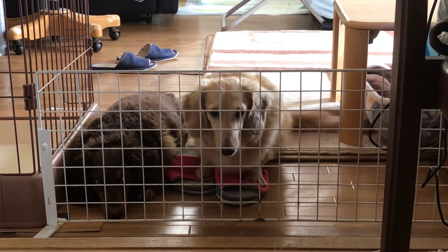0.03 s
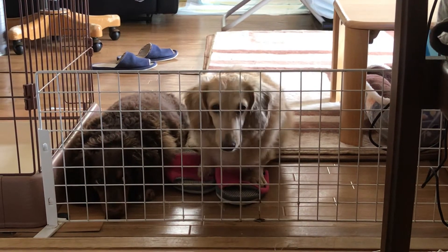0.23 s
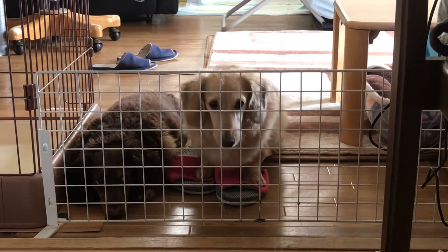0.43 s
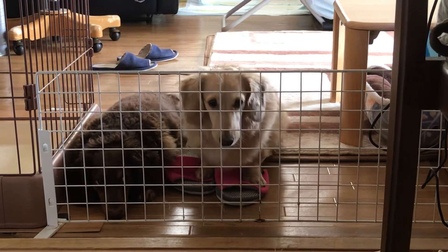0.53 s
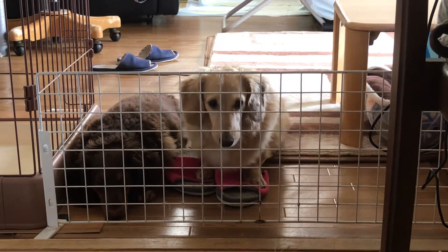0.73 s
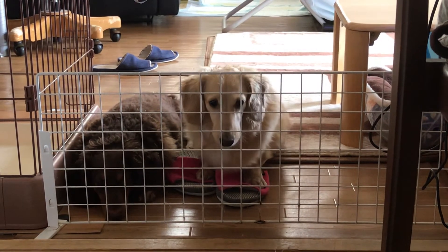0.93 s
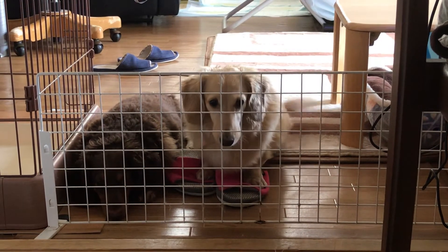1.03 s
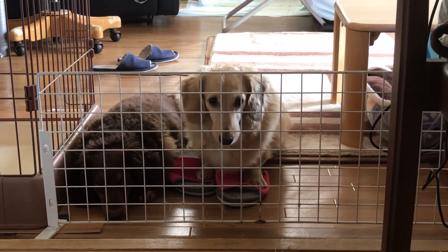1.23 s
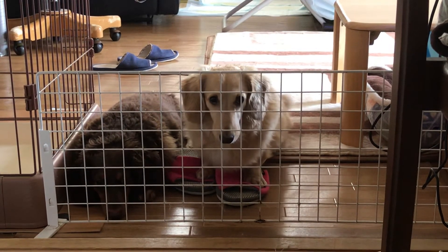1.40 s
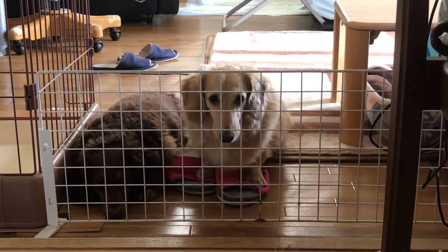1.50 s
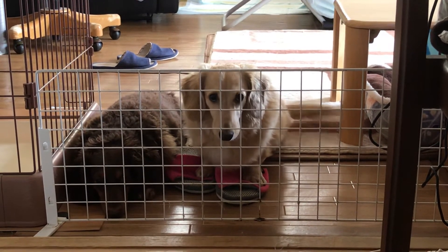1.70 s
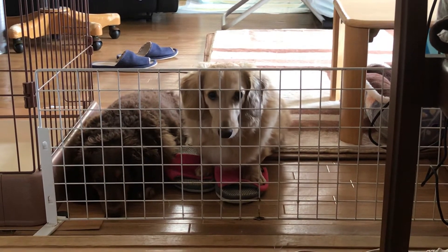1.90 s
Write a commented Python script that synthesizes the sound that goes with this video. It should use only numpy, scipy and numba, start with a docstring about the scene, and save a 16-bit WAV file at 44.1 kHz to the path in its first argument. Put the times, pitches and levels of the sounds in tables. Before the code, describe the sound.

A small dog gives one huffing woof that breaks up into a yelp and sinks into a low growl. Faint sniffs follow, then a long, rumbling breath out, close to the microphone in a quiet room.

```python
"""A small wooden-floored room, one microphone near a small dog behind a pet gate; faint mains hum.
After a soft rustle the dog gives one huffing woof, mouth barely open, air rushing through lips and
nose. Its pitch breaks upward into a yelp, then sinks into a low growl with two quick sniffs. A third
sniff whistles thinly as slack, uneven throat pulses set chest and throat rumbling over a long breath
out. The room rings briefly after each sound, and a few last rustles leave only room air and hum."""
import sys
import numpy as np
from scipy import signal
from scipy.fft import rfft, irfft
from scipy.io import wavfile
from scipy.ndimage import uniform_filter1d
from numba import njit

SR = 44100
rng = np.random.default_rng(int(sys.argv[2]) if len(sys.argv) > 2 else 0)


def store_pcm(level_fs):
    """Save levels as 16-bit WAV."""
    pcm = np.round(np.clip(level_fs, -1, 1) * 32767).astype(np.int16)
    wavfile.write(sys.argv[1], SR, np.atleast_2d(pcm).T)


N = 85995

# colour of the room air: freq_hz, gain_db
ROOM_AIR_COLOUR = [(20,-36),(40,-37),(65,-6),(160,-0.5),(270,-14.5),(345,-9),(450,-14),(1200,-18),(2000,-23.5),(15500,-36.5)]
# mains hum: pitch_hz, level_db
HUM_TONES = [(50.3,-67),(100.6,-68.5)]
# the dog's small movements: centre_s, half_length_s, level_db
RUSTLES = [(.055,0.016,-62.5),(1.236,0.004,-61),(1.558,0.0074,-64),(1.865,0.025,-66.5),(1.94,0.046,-72.5)]
# their colour: freq_hz, gain_db
RUSTLE_COLOUR = [(250,-7.5),(650,7.5),(2100,-0.5),(4500,-9),(15000,-26)]

# sniffs, the long breath out, and spurts that flap the lips: centre_s, half_length_s, level_db
SNIFFS = [(.65,0.023,-67.5),(.75,0.037,-66),(1.06,0.064,-69.5)]
EXHALE = [(1.33,0.31,-77)]
LIP_FLAPS = [(.396,0.0096,-48),(.419,0.0027,-50),(.444,0.0039,-47),(.519,0.003,-50.5)]
# nose whistle in the last sniff: time_s, pitch_hz, level_db
NOSE_WHISTLE = [(1.03,3650,-75),(1.06,3510,-75),(1.09,3290,-69),(1.13,3120,-88)]
# air flow along four paths: time_s, mouth_db, lips_db, teeth_db, nose_db
AIR_FLOW = [(.208,-95,-85,-59,-92),(.215,-58,-62,-60.5,-92),(.24,-51.5,-70,-56,-83),(.28,-49.5,-63,-54.5,-56),(.335,-45.5,-56,-51.5,-79),(.37,-48,-51.5,-53.5,-55.5),(.398,-52,-45.5,-66,-58),(.45,-60,-55,-79,-60),(.52,-65,-58.5,-77,-63.5),(.59,-79,-66,-87,-68),(.72,-67,-70,-72,-69),(.88,-75,-94,-100,-74.5),(.95,-74,-86,-75,-75)]
# colours of those paths, of a sniff and of the throat behind a closed mouth: freq_hz, gain_db
MOUTH_COLOUR = [(200,-13),(420,0.5),(530,-7),(670,2),(760,-4),(850,-7.5),(980,-8.5),(1200,-5.5),(1370,-10),(1520,-7),(1750,-25),(3000,-31),(8000,-70)]
LIPS_COLOUR = [(300,-43),(900,-10.5),(1500,-3),(1700,-17.5),(1870,2),(2030,3),(2220,-7),(2430,-5.5),(2750,-22.5),(3150,-8.5),(3500,-26.5),(3900,-12),(4800,-42),(12000,-29)]
TEETH_COLOUR = [(1500,-25.5),(2470,7.5),(3000,-13.5),(3850,-1.5),(4650,-8.5),(5200,4),(6650,-6),(7400,-2.5),(8000,-14),(8700,1),(9900,-1),(12000,-13.5),(15500,-11)]
NOSE_COLOUR = [(1400,-18.5),(2400,1.5),(3300,-9),(4400,3.5),(5050,-31.5),(6000,-3.5),(7400,1),(8600,4),(9600,1.5),(11000,-14),(12600,-12),(15500,-18)]
SNIFF_COLOUR = [(1500,-17),(4800,6),(8500,4.5),(10000,11),(11300,2),(15500,-4)]
THROAT_COLOUR = [(90,-29),(165,3),(215,1),(270,-2.5),(355,2.5),(440,-2.5),(530,-14),(650,-8.5),(850,-13.5),(990,-23),(1230,-8.5),(1400,-46),(2300,-21),(3500,-55.5)]
# the hiss at the teeth brightens as the air gathers speed: time_s, cutoff_hz
HISS_TOP = [(.21,6100),(.245,7600),(.275,12300),(.32,18000)]
# narrow resonances of the muzzle: freq_hz, gain_db
MUZZLE_MODES = [(1515,-3),(2025,-5.5),(2460,3.5),(3130,-9.5),(3870,-4),(6020,5.5),(8720,-5.5)]

# slack pulsing of the throat, under the woof and then after it: time_s, level_db
RUMBLE_LEVEL = [(.21,-59),(.234,-53),(.31,-51),(.42,-61),(.56,-62),(.7,-61),(.76,-57),(.89,-58),(.94,-71),(1.0,-61.5),(1.045,-47.5),(1.077,-59),(1.094,-47.5),(1.14,-47),(1.157,-47.5),(1.195,-61),(1.208,-44.5),(1.262,-43.5),(1.41,-43),(1.455,-47.5),(1.53,-51.5),(1.56,-66)]
# resonances that each slack pulse rings: freq_hz, width_hz, gain_db
CHEST_MODES = [(112,48,-0.5),(172,46,-1.5),(316,58.3,-11),(419,73,-14),(720,130,-38),(1156,57,-24)]
# resonance of the mouth as the jaw drops: time_s, freq_hz, level_db
JAW_RESONANCE = [(.224,680,-58),(.243,690,-44),(.263,696,-49),(.283,674,-45.5),(.312,630,-50),(.335,590,-54),(.385,617,-53),(.42,650,-58),(.48,650,-81)]
# the woof's break into a yelp and its fall to a growl: time_s, pitch_hz
VOICE_PITCH = [(.22,112),(.24,130.8),(.262,174.5),(.285,211.8),(.299,222),(.307,318.6),(.335,309),(.362,296.8),(.377,272.5),(.384,201.4),(.412,176.9),(.446,155.8),(.494,141.9),(.56,118.9),(.66,114.4),(.74,113.4),(.79,108),(.9,107)]
# strength of the voice: time_s, fundamental_db, overtones_db, rasp_db
VOICE_LEVELS = [(.214,-85,-61,-77),(.233,-38.5,-49,-48),(.285,-38.5,-39.5,-46),(.308,-41.5,-43.5,-46),(.326,-34,-54,-45),(.358,-36.5,-59.5,-49.5),(.385,-43,-41,-61),(.44,-40,-45,-51.5),(.52,-44,-52.5,-51),(.6,-43.5,-53,-53),(.68,-44.5,-58.5,-55),(.73,-41,-60,-56.5),(.79,-41.5,-59,-57),(.897,-46.5,-65,-60.5),(.925,-79,-86,-64.5)]
# a second, slower fold rattles against the voice: time_s, depth (0-1)
FOLD_RATTLE = [(.3,.45),(.33,.3),(.47,.2),(.6,.35),(.7,.15),(.9,.22)]
# catches where the voice nearly stops: centre_s, half_length_s, depth_db
CATCHES = [(.424,0.0084,8.5),(.54,0.0078,15),(.625,0.0081,10),(.668,0.0032,24),(.758,0.0072,38),(.807,0.0099,30),(1.246,0.006,15),(1.279,0.0031,12)]


def undb(db):
    """Decibels to gain."""
    return 10 ** (np.asarray(db) / 20)


def unit(x):
    """Scale to rms 1."""
    return x / np.sqrt(np.mean(x ** 2))


def curve(table, column=1):
    """One column of a table, joined by straight lines in time."""
    rows = np.array(table)
    return np.interp(np.arange(N) / SR, rows[:, 0], rows[:, column])


def strength(table, column=1):
    """Gain from a dB column, fading to silence outside its span."""
    t = np.arange(N) / SR
    sounding = 1. * ((t > table[0][0]) & (t < table[-1][0]))
    return undb(curve(table, column)) * uniform_filter1d(sounding, size=400)


def bumps(table, gain=undb):
    """Bell-shaped swells at the rows' times."""
    t = np.arange(N) / SR
    return sum(gain(db) * np.exp(-((t - at) / half) ** 2) for at, half, db in table)


def colour(x, points):
    """Causal filter through (Hz, dB) points; rms 1."""
    rows, size = np.array(points), 2 * N
    hz = np.maximum(np.fft.rfftfreq(size, 1 / SR), 1)
    gain_db = np.interp(np.log(hz), np.log(rows[:, 0]), rows[:, 1])
    cepstrum = irfft(np.log(undb(gain_db)))
    cepstrum[1:N] *= 2  # fold to minimum phase
    cepstrum[N + 1:] = 0
    return unit(irfft(rfft(x, size) * np.exp(rfft(cepstrum)))[:N])


def noise(points):
    """Coloured noise of rms 1."""
    return colour(rng.standard_normal(N), points)


def drift(rate_hz):
    """Smooth random drift of rms 1."""
    hold = max(int(SR / rate_hz), 1)
    steps = np.repeat(rng.standard_normal(N // hold + 1), hold)[:N]
    return unit(uniform_filter1d(steps, hold))


def steady(x, span_s):
    """Hold a sound at rms 1 over the given span."""
    span = int(span_s * SR)
    power = uniform_filter1d(uniform_filter1d(x * x, span), span)
    return x / np.sqrt(np.maximum(power, 1e-9))


@njit
def resonate(x, hz, width_hz):
    """Moving resonance; returns its band-pass and low-pass outputs."""
    out, band_state, low_state = np.empty((2, len(x))), 0., 0.
    for i in range(len(x)):
        g, damping = np.tan(np.pi * min(hz[i] / SR, .45)), width_hz[i] / hz[i]
        band = (band_state + g * (x[i] + 1e-18 - low_state)) / (1 + g * (g + damping))
        out[0, i], out[1, i] = damping * band, low_state + g * band
        band_state, low_state = 2 * band - band_state, low_state + 2 * g * band
    return out


def room_tone(air_db=-63, waver_db=3):
    """Quiet room air and a slightly wavering mains hum."""
    t = np.arange(N) / SR
    hum = 0
    for hz, db in HUM_TONES:
        peak = np.sqrt(2) * undb(db + waver_db * drift(6.62))
        hum += peak * np.sin(2 * np.pi * (hz * t + rng.random()))
    return hum + undb(air_db) * noise(ROOM_AIR_COLOUR)


def room(x, t60_s=0.35, reflections_db=-4.5, low_cut_hz=259):
    """Dense reflections from floor and walls reach the microphone just after the direct sound."""
    t = np.arange(SR // 2) / SR
    tail = rng.standard_normal(len(t)) * np.exp(-np.log(1000) * t / t60_s) * (t > .003)
    tail = signal.sosfilt(signal.butter(2, low_cut_hz, "high", fs=SR, output="sos"), tail)
    return x + undb(reflections_db) * signal.fftconvolve(x, tail / np.linalg.norm(tail))[:N]


def rustles():
    """The dog's small movements make soft swells of noise."""
    return noise(RUSTLE_COLOUR) * bumps(RUSTLES)


def nose():
    """Quick sniffs, the last with a thin whistle, then a long breath out."""
    whistle_hz = curve(NOSE_WHISTLE) * (1 + 0.023 * drift(570))
    whistle = np.sin(2 * np.pi * np.cumsum(whistle_hz) / SR) * strength(NOSE_WHISTLE, column=2)
    return noise(SNIFF_COLOUR) * bumps(SNIFFS) + whistle + noise(NOSE_COLOUR) * bumps(EXHALE)


def throat_pulses(cycles, jitter, shimmer_db):
    """One pulse a cycle, each early or late (jitter, in cycles) and of its own size."""
    beats = np.arange(1, int(cycles[-1]))
    late, size = rng.standard_normal((N // 50, 2))[:len(beats)].T
    onsets = np.interp(beats + jitter * late, cycles, np.arange(N)).astype(int)
    train = np.zeros(N)
    np.add.at(train, onsets, undb(shimmer_db * size))
    return train


def puffs(train, decay_s, flutter=0.7):
    """Air flow that flutters with the throat pulses."""
    flow = signal.lfilter([1], [1, -np.exp(-1 / (decay_s * SR))], train)
    flow = steady(uniform_filter1d(flow, size=60), 0.11)
    return steady(1 - flutter + flutter * flow, 0.051)


def catches():
    """Gain that dips briefly where the voice catches."""
    return undb(-bumps(CATCHES, gain=float))


def rumble(pulse_hz=66.6, snore_db=-27, rasp_db=-16):
    """Slow, uneven pulses ring chest and throat while the nose hisses."""
    train = throat_pulses(np.arange(N) / SR * pulse_hz, jitter=0.2115, shimmer_db=2.6)
    body = sum((-1) ** k * undb(db) * signal.lfilter(*signal.iirpeak(hz, hz / width, fs=SR), train)
               for k, (hz, width, db) in enumerate(CHEST_MODES))
    body = colour(body, [(40, -35.5), (70, -15), (100, 7.5), (1250, -3.5), (6000, -22)])
    air = undb(snore_db) * noise(NOSE_COLOUR) + undb(rasp_db) * noise(THROAT_COLOUR)
    air *= puffs(train, decay_s=0.0075)
    return (steady(body, .025) * catches() + air) * strength(RUMBLE_LEVEL)


def huff():
    """Air rushes through mouth, lips and nostrils and hisses ever brighter at the teeth."""
    paths = MOUTH_COLOUR, LIPS_COLOUR, TEETH_COLOUR, NOSE_COLOUR
    mouth, lips, teeth, nostrils = (noise(path) * strength(AIR_FLOW, column)
                                    for column, path in enumerate(paths, 1))
    cutoff_hz = curve(HISS_TOP)
    _, hiss = resonate(teeth, cutoff_hz, np.sqrt(2) * cutoff_hz)
    return mouth + lips + nostrils + hiss


def mouth_ring(cycles, width_hz=178.):
    """Uneven throat pulses ring the briefly opened mouth."""
    ring = throat_pulses(cycles, jitter=0.078, shimmer_db=4)
    for _ in range(2):
        ring = resonate(ring, curve(JAW_RESONANCE), np.full(N, width_hz))[0]
    return steady(ring, 0.025) * strength(JAW_RESONANCE, column=2)


def overtones(hz, cycles, flicker_db=7, wander_rad=.5):
    """Harmonics 2 and 3, weighted by the throat as they glide through it; each flickers alone."""
    throat_hz, throat_db = np.array(THROAT_COLOUR).T
    out = 0
    for k in (2, 3):
        db = np.interp(np.log(k * hz), np.log(throat_hz), throat_db) + flicker_db * drift(80.7)
        out += undb(db) * np.sin(2 * np.pi * (k * cycles + rng.random()) + wander_rad * drift(90))
    return steady(out, 0.034) * strength(VOICE_LEVELS, column=2)


def vocal_folds(hz, cycles, rattle_hz=61.82):
    """The folds sound a fundamental and overtones; a slower fold shakes the fundamental's level."""
    rattle_cycles = np.cumsum(rattle_hz * (1 + .15 * drift(60.4))) / SR
    rattle = 1 + curve(FOLD_RATTLE) * np.sin(2 * np.pi * rattle_cycles)
    fundamental = np.sqrt(2) * np.sin(2 * np.pi * cycles) * strength(VOICE_LEVELS)
    return fundamental * rattle + overtones(hz, cycles)


def woof(waver=.014):
    """One wavering pitch drives voice, mouth ring and the flutter of rasp and air; the lips flap."""
    hz = curve(VOICE_PITCH) * (1 + waver * drift(129.3))
    cycles = np.cumsum(hz) / SR
    flow = puffs(throat_pulses(cycles, jitter=0.024, shimmer_db=7.5), decay_s=0.0059)
    voice = vocal_folds(hz, cycles)
    rasp = noise(THROAT_COLOUR) * strength(VOICE_LEVELS, column=3)
    breath = (rasp + huff()) * flow
    voiced = (voice + mouth_ring(cycles)) * catches()
    return voiced + breath + noise(LIPS_COLOUR) * bumps(LIP_FLAPS)


def muzzle(x, q=62):
    """The muzzle lifts a few narrow bands of the sound that passes through it."""
    return x + sum(undb(db) * signal.lfilter(*signal.iirpeak(hz, q, fs=SR), x)
                   for hz, db in MUZZLE_MODES)


def scene(low_cut_hz=72):
    """At the microphone: the dog, without deep bass, its movements and the room."""
    dog = muzzle(woof() + rumble() + nose())
    dog = signal.sosfilt(signal.butter(4, low_cut_hz, "high", fs=SR, output="sos"), dog)
    return (room(dog + rustles()) + room_tone())[None]


def record(dry, top_hz=15800):
    """The recorder cuts the top."""
    return signal.sosfilt(signal.ellip(10, .2, 70, top_hz, fs=SR, output="sos"), dry)


dry = scene()
out = record(dry)
store_pcm(out)
```